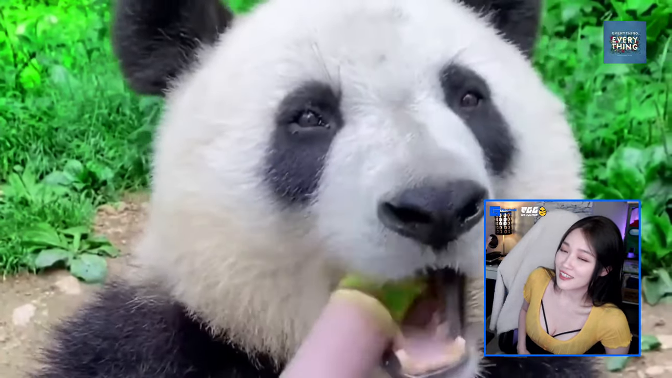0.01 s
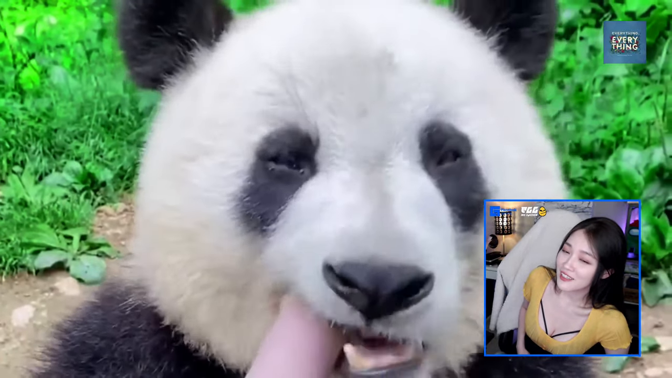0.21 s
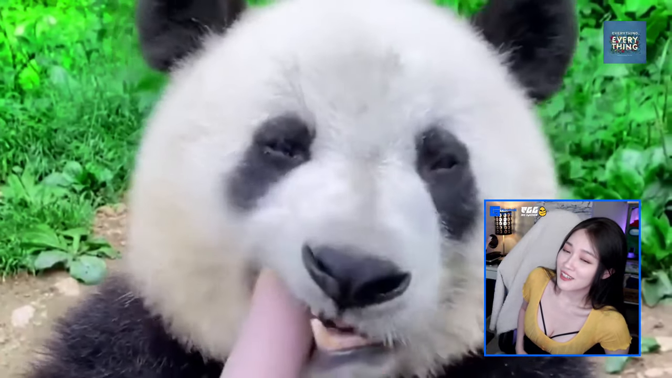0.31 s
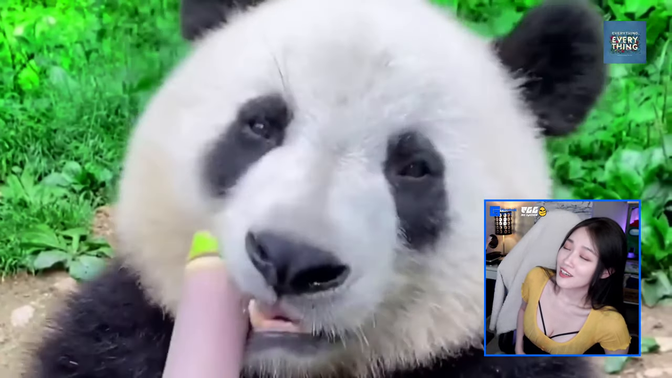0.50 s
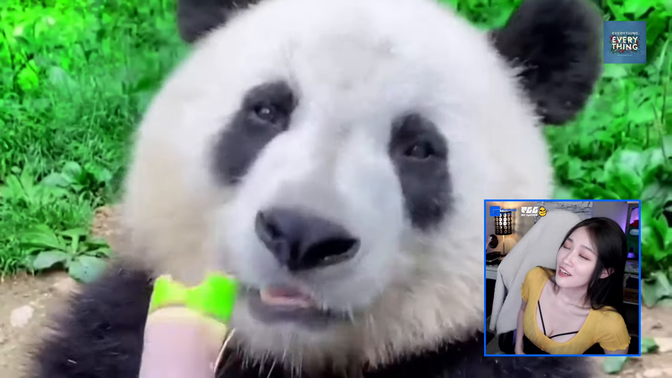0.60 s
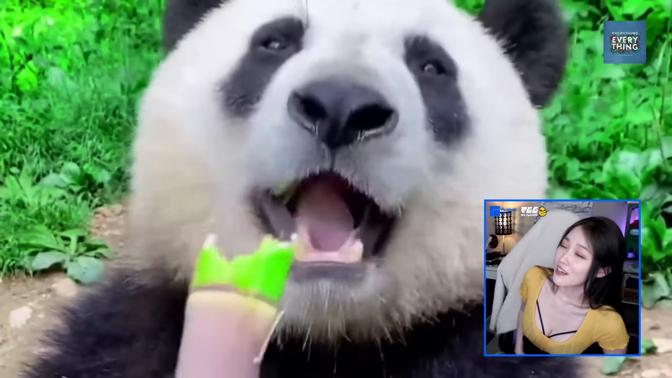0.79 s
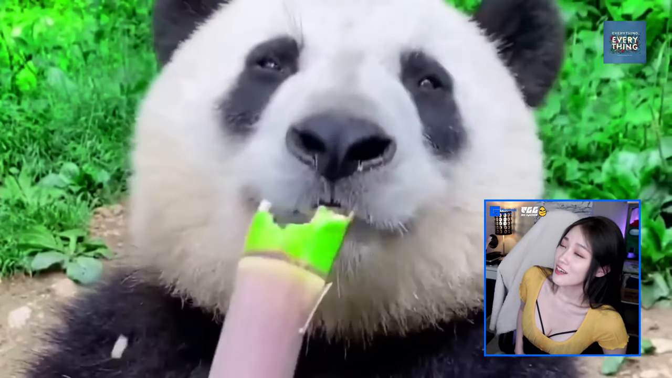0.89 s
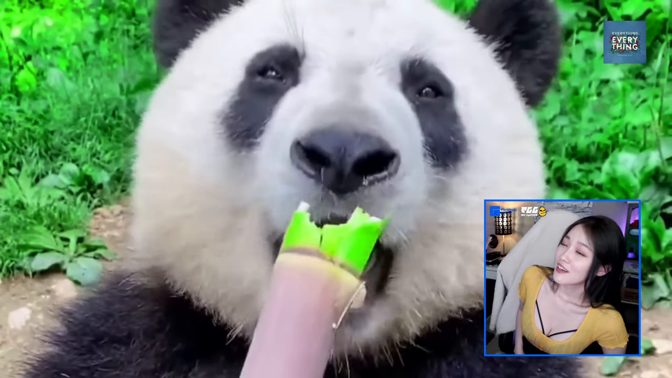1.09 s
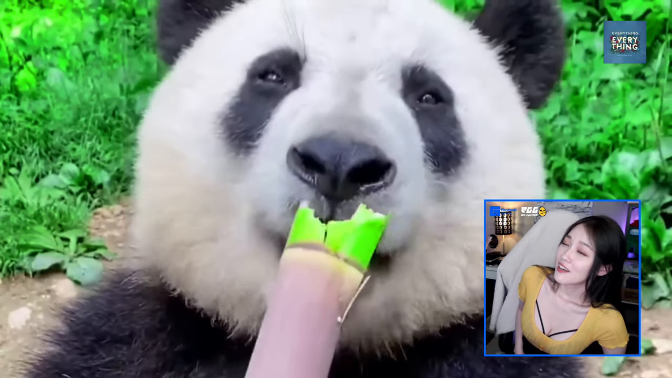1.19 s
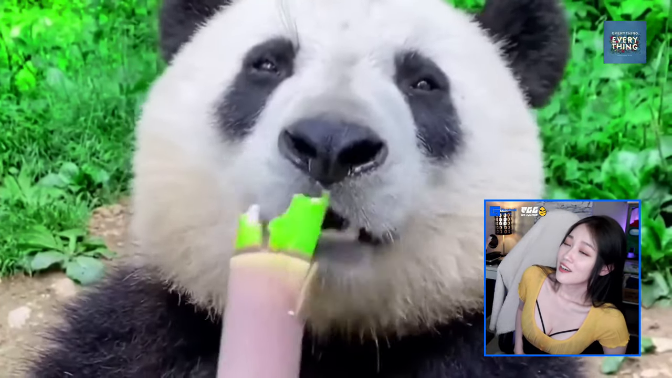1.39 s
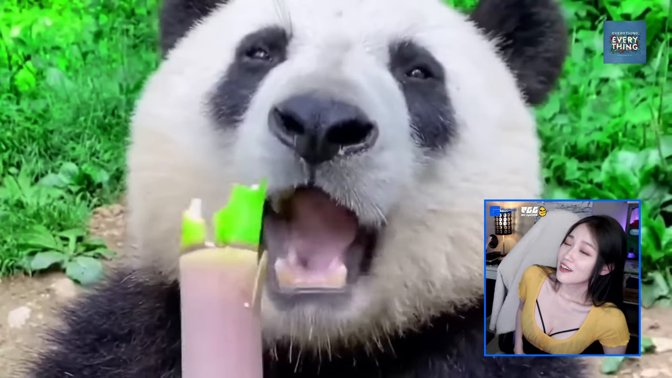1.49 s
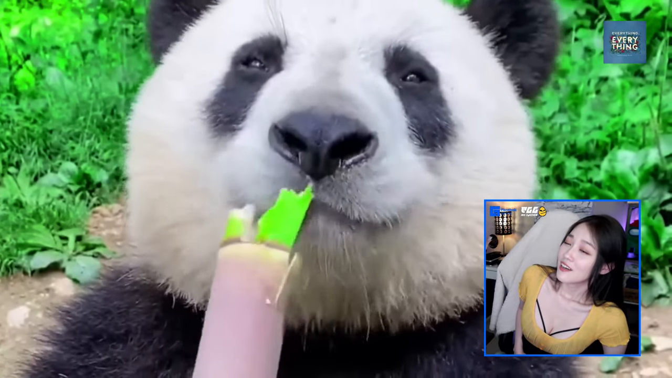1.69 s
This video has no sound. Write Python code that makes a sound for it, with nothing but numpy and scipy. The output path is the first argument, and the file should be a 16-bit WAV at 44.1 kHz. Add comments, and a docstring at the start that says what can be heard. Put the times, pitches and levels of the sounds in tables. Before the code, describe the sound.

A panda bites a bamboo shoot, close and dry outdoors. Small snaps and wet mouth pops open; at 0.25 seconds the hollow shoot cracks with a loud, short knock, fibres tearing until brighter final snaps near 0.63. From 0.8 to 1.7, softer, muffled wet chewing with irregular cracks, strongest near 1.1 and 1.48. A thin distant whistle sounds around 0.9, a low gurgle around 1.3, over faint steady air.

```python
"""A panda outdoors, close in front of the microphone, bites through a bamboo shoot and chews it.
First come wet pops of the mouth and a few small snaps. Then the hollow shoot gives way with a knock, a bank of
decaying sines, its fibres tear as coloured grains, and the last strands break one by one as clicked noise bursts.
The molars then crush the piece six or seven times a second, grains ringing in the changing mouth; a faint whistle
sounds far off, then a low gurgle of narrow noise. Steady outdoor air, filtered noise, lies behind it all."""
import sys
import numpy as np
from scipy import signal
from scipy.fft import rfft, irfft, next_fast_len
from scipy.io import wavfile

SR = 44100
rng = np.random.default_rng(int(sys.argv[2]) if len(sys.argv) > 2 else 0)


def bounce(signal):
    """Save signal as a 16-bit WAV file at the path given by the first command-line argument."""
    frames = np.transpose(np.atleast_2d(signal))
    limited = np.clip(frames, -1, 1)
    pcm = np.round(limited * 32767).astype(np.int16)
    wavfile.write(sys.argv[1], SR, pcm)


N = 77175
TIME = np.arange(N) / SR
TREBLE_HZ = 4870  # corner above which the treble of snaps, cracks, tearing and chewing is set


def amp(db):
    """Decibels to gain."""
    return 10 ** (np.asarray(db) / 20)


def unit(x):
    """Scale to rms 1."""
    return x / np.sqrt(np.mean(x ** 2) + 1e-20)


def at_hz(points, hz):
    """Read a spectrum in dB on a log-frequency axis."""
    point_hz, point_db = np.transpose(points)
    return np.interp(np.log(hz), np.log(point_hz), point_db)


def curve(rows):
    """A level curve as a gain, down at -120 dB outside its span, then any further columns."""
    s, db, *rest = np.transpose(rows)
    gain = amp(np.interp(TIME, s, db, left=-120, right=-120))
    return [gain] + [np.interp(TIME, s, column) for column in rest]


def shelf(hz, corner_hz):
    """0 in the bass, 1 in the treble."""
    return 1 / (1 + (corner_hz / hz) ** 4)


def resonance(hz, centre_hz, octaves):
    """1 at the centre, falling to a half this many octaves to either side."""
    return 1 / (1 + (np.log2(hz / centre_hz) / octaves) ** 2)


def colour(x, db_at):
    """Causal (minimum-phase) filter with the response db_at(Hz), made by folding the cepstrum."""
    n = x.shape[-1]
    size = 2 * next_fast_len(n)
    hz = np.maximum(np.arange(size // 2 + 1) * SR / size, 1)
    cepstrum = irfft(np.log(amp(db_at(hz))))
    cepstrum[1:size // 2] *= 2
    cepstrum[size // 2 + 1:] = 0
    response = np.exp(rfft(cepstrum))
    return irfft(rfft(x, size) * response)[..., :n]


def drift(rate_hz):
    """Slow chance with rms 1: noise through two equal low-pass poles, after a second of settling."""
    r = np.exp(-2 * np.pi * rate_hz / SR)
    slow = signal.lfilter([1], [1, -2 * r, r * r], rng.standard_normal(N + SR))
    return unit(slow[SR:])


def grains(per_s, spread_db, flutter_db):
    """Plant cells burst as clicks of uneven size and random sign, in clumps."""
    sizes = amp(spread_db * np.minimum(rng.exponential(1, N), 4))
    clicks = sizes * rng.choice([-1, 1], N) * (rng.random(N) < per_s / SR)
    return unit(clicks * amp(flutter_db * drift(62)))


FRACTURE_LEAD_S, FRACTURE_RISE_S = .008, 0.0012


def fractures(rows, body_db, click, size=2048):
    """Tiny cracks build up to a sharp click and then die away; the level is the rms over 5 ms."""
    lead = int(FRACTURE_LEAD_S * SR)
    out = np.zeros(N + size)
    t = (np.arange(size) - lead) / SR
    for s, db, decay_s, treble_db, *ring in rows:
        envelope = np.exp(np.minimum(t / FRACTURE_RISE_S, -t / decay_s))
        burst = unit(rng.standard_normal(size) * envelope)
        burst[lead] += click * np.sqrt(size)
        burst = colour(burst, lambda hz: body_db(hz, s, *ring) + treble_db * shelf(hz, TREBLE_HZ))
        start = max(int(s * SR), 0)
        out[start:start + size] += amp(db) * unit(burst) * np.sqrt(.005 * SR / size)
    return out[lead:lead + N]


# Colour of the breaking fibres in the open. Each row: frequency in Hz, level in dB.
OPEN_COLOUR = [(40, -30.5), (200, -21.5), (420, -2), (620, -7.5), (1200, 2.5), (1700, -4.5), (2150, -2),
               (3600, -4), (6300, -7.5), (7400, -13), (10000, -10), (15500, -20)]
SPLINTER_DB, SPLINTER_WIDTH_OCT = 13, 0.11


def splinter_db(hz, s, ring_hz):
    """Colour of a snap in the open, with the ring of its splinter."""
    return at_hz(OPEN_COLOUR, hz) + SPLINTER_DB * resonance(hz, ring_hz, SPLINTER_WIDTH_OCT)


# Fibres snapping at the front teeth. Each row: click time in seconds, level in dB, decay in seconds,
# treble boost in dB, ring of the splinter in Hz.
SNAPS = [(0.002, -28, 0.0044, -11.5, 1430), (0.1115, -44, 0.0035, 27, 6200),
         (0.1757, -46.5, 0.0036, -11, 3050), (0.2423, -19.5, 0.0033, -10, 2090),
         (0.261, -12.5, 0.0013, -18, 2130), (0.2755, -21.5, 0.0099, -0.5, 1000),
         (0.3086, -25, 0.0048, -4, 1150), (0.334, -25, 0.0014, -6, 4220), (0.3485, -21.5, 0.0079, -2, 980),
         (0.3808, -25, 0.0012, -10, 1420), (0.4475, -27.5, 0.0035, 8, 2140),
         (0.5015, -31, 0.0015, 19, 4470), (0.5128, -34, 0.0018, 17, 4330),
         (0.5784, -33.5, 0.00091, 18.5, 5340), (0.5963, -27, 0.0018, 4, 2300),
         (0.6123, -25, 0.00074, 12.5, 2250), (0.6241, -24, 0.00084, 29, 10450),
         (0.6312, -20.5, 0.0032, 6.5, 3410), (0.6331, -16.5, 0.0023, -4, 3740)]
# Tearing fibres. Each row: time in seconds, level in dB before the brightening.
TEAR = [(0, -36.5), (.055, -67.5), (.11, -45), (.14, -103), (.21, -52), (.268, -29.5), (.302, -39.5),
        (.33, -35), (.352, -22.5), (.40, -34.5), (.44, -38.5), (.458, -35), (.514, -37.5), (.535, -80),
        (.572, -59.5), (.60, -45.5), (.648, -41), (.72, -92)]
TEAR_GRAINS_PER_S, TEAR_SPREAD_DB, TEAR_FLUTTER_DB = 1800, 2, 3
TEAR_BRIGHTENS_DB_PER_S, TEAR_MID_S = 27.5, 0.27  # the treble is unchanged at the mid time


def bite(click):
    """Fibres snap and tear; the tearing brightens as the strands get thinner."""
    cells = grains(TEAR_GRAINS_PER_S, TEAR_SPREAD_DB, TEAR_FLUTTER_DB)
    tear = unit(colour(cells, lambda hz: at_hz(OPEN_COLOUR, hz)))
    low = signal.sosfiltfilt(signal.butter(2, TREBLE_HZ, fs=SR, output="sos"), tear)
    treble_gain = amp(TEAR_BRIGHTENS_DB_PER_S * (TIME - TEAR_MID_S))
    tear = low + (tear - low) * treble_gain
    return tear * curve(TEAR)[0] + fractures(SNAPS, splinter_db, click)


# Knocks of the hollow shoot as it gives way. Each row: start in seconds, level in dB, treble boost in dB.
KNOCKS = [(0.2425, -21.5, 3.5), (0.2627, -4, 1), (0.2766, -16, 9)]
# Modes of the shoot. Each row: frequency in Hz, level in dB, time to fall by 60 dB in seconds.
SHOOT_MODES = [(430, -1, 0.04), (470, -3.5, 0.099), (1066, -5.5, 0.041), (1779, -13, 0.051),
               (2160, -22.5, 0.021)]
KNOCK_ATTACK_S, KNOCK_TREBLE_HZ = 0.0029, 770


def hollow_shoot():
    """The shoot rings briefly in its decaying modes when its wall breaks."""
    out = np.zeros(N)
    for s, db, treble_db in KNOCKS:
        t = np.maximum(TIME - s, 0)
        attack = 1 - np.exp(-(t / KNOCK_ATTACK_S) ** 2)
        for hz, mode_db, t60_s in SHOOT_MODES:
            fade = np.exp(-np.log(1000) * t / t60_s) * attack
            gain = amp(db + mode_db + treble_db * shelf(hz, KNOCK_TREBLE_HZ))
            out += gain * fade * np.sin(2 * np.pi * hz * t)
    return out


# Colour of the breaking fibres inside the mouth. Each row: frequency in Hz, level in dB.
MOUTH_COLOUR = [(40, -21), (200, -17), (520, -10.5), (750, -1.5), (1500, -0.5), (2600, -3.5), (4600, -6.5),
                (7000, -17.5), (15500, -25.5)]
MOUTH_PEAKS_DB, MOUTH_WIDTH_OCT = (12.5, 7.5, 9), 0.12


def mouth_db(hz, s):
    """Colour of the mouth, with three resonances, during the stroke nearest to time s."""
    chew = min(CHEWS, key=lambda row: abs(row[0] - s))
    centres_hz = chew[-len(MOUTH_PEAKS_DB):]
    peaks = zip(centres_hz, MOUTH_PEAKS_DB)
    return at_hz(MOUTH_COLOUR, hz) + sum(db * resonance(hz, centre, MOUTH_WIDTH_OCT) for centre, db in peaks)


# Chewing strokes. Each row: time of full pressure in seconds, level there in dB, attack, hold and release
# in seconds, treble boost in dB, three mouth resonances in Hz.
CHEWS = [(0.794, -51.5, 0.039, 0.011, 0.053, 14, 1025, 1774, 2390),
         (0.941, -33.5, 0.018, 0.025, 0.026, 4.5, 910, 1650, 3350),
         (1.097, -34.5, 0.0052, 0.073, 0.005, 4, 1072, 2220, 2660),
         (1.272, -38, 0.011, 0.031, 0.061, 5.5, 1042, 1295, 2010),
         (1.487, -33.5, 0.026, 0.037, .012, 8.5, 1058, 1430, 2210),
         (1.623, -34.5, 0.0049, 0.022, 0.015, -7.5, 960, 3380, 4560),
         (1.699, -42, 0.078, 0.01, 0.034, 2.5, 1030, 1320, 2300)]
# Pieces cracking between the molars. Each row: click time in seconds, level in dB, decay in seconds,
# treble boost in dB.
CRACKS = [(0.942, -28, 0.016, 3.5), (0.956, -31, 0.002, -4), (1.094, -26.5, 0.0098, -8),
          (1.110, -31, 0.0027, 8), (1.1165, -19.5, 0.0029, -16), (1.1445, -29.5, 0.0069, 6.5),
          (1.276, -33.5, 0.0026, -12), (1.4752, -18, 0.0021, -25.5), (1.511, -33, 0.00074, -9),
          (1.6195, -32.5, 0.0014, -23), (1.7168, -34.5, 0.0011, 6.5)]
CHEW_GRAINS_PER_S, CHEW_SPREAD_DB, CHEW_FLUTTER_DB = 1800, 1.5, 3.5


def chewing(click):
    """Strokes crush wet pulp while a few pieces crack, all heard through the mouth."""
    out = fractures(CRACKS, mouth_db, click)
    for s, db, attack_s, hold_s, release_s, treble_db, *_ in CHEWS:
        rise = np.minimum(TIME - s, 0) / attack_s
        fall = np.maximum(TIME - s - hold_s, 0) / release_s
        pressure = np.exp(rise - fall)
        cells = grains(CHEW_GRAINS_PER_S, CHEW_SPREAD_DB, CHEW_FLUTTER_DB)
        pulp = unit(colour(cells, lambda hz: mouth_db(hz, s) + treble_db * shelf(hz, TREBLE_HZ)))
        out = out + amp(db) * pressure * pulp
    return out


# Wet pops. Each row: start in seconds, level in dB before the fade and the random waver.
POPS = [(0.0255, -30), (0.1755, -30.5), (1.153, -27.5), (1.519, -26)]
POP_HZ, POP_T60_S = 719, 0.061


def pops():
    """Tongue and lips come unstuck and the mouth cavity rings, wavering at random."""
    out = np.zeros(N)
    for s, db in POPS:
        t = np.maximum(TIME - s, 0)
        fade = np.exp(-np.log(1000) * t / POP_T60_S) * (1 - np.exp(-t / KNOCK_ATTACK_S))
        waver = 0.75 * drift(60)
        out += amp(db) * fade * waver * np.sin(2 * np.pi * POP_HZ * t)
    return out


# Low gurgle during the chewing. Each row: time in seconds, level of the resonance in dB, its pitch in Hz.
GURGLE = [(1.19, -63, 336.8), (1.315, -47.5, 267.7), (1.36, -51.5, 184), (1.47, -59.5, 137),
          (1.55, -62.5, 128)]
GURGLE_WIDTH_HZ = 43
GURGLE_RUMBLE_DB, RUMBLE_LOW_HZ, RUMBLE_TOP_HZ = 2, 71.5, 440  # rumble level is relative to the resonance


def gurgle():
    """A rough low resonance, slow noise shifted up in pitch, sinks over a soft rumble."""
    gain, hz = curve(GURGLE)
    roughness = drift(GURGLE_WIDTH_HZ) + 1j * drift(GURGLE_WIDTH_HZ)
    ring = unit(np.real(roughness * np.exp(2j * np.pi * np.cumsum(hz) / SR)))
    band = signal.butter(2, [RUMBLE_LOW_HZ, RUMBLE_TOP_HZ], "band", fs=SR, output="sos")
    rumble = unit(signal.sosfilt(band, rng.standard_normal(N)))
    return gain * (ring + amp(GURGLE_RUMBLE_DB) * rumble)


# Thin distant whistle, perhaps a bird. Each row: time in seconds, level in dB, pitch in Hz.
WHISTLE = [(.81, -57, 4880), (.87, -51.5, 4690), (.91, -49, 4720), (1.01, -54, 4680), (1.1, -62, 4700)]
WHISTLE_WAVER_HZ = 28


def whistle(flutter_db=5.5):
    """One thin sine that falls and then roughly holds, its pitch and level fluttering."""
    gain, hz = curve(WHISTLE)
    wavering_hz = hz + WHISTLE_WAVER_HZ * drift(65)
    note = np.sin(2 * np.pi * np.cumsum(wavering_hz) / SR)
    return gain * unit(amp(flutter_db * drift(39)) * note)


# Colour of the outdoor background. Each row: frequency in Hz, level in dB.
AIR_COLOUR = [(30, -15.5), (430, 4.5), (800, -9), (2500, -4), (15500, -13.5)]
AIR_DB = -60


def air():
    """Steady outdoor background of filtered noise."""
    return amp(AIR_DB) * unit(colour(rng.standard_normal(N), lambda hz: at_hz(AIR_COLOUR, hz)))


def panned(x, db):
    """Place a sound by its left-minus-right level."""
    return x * amp(np.array([[db], [-db]]) / 2)


def reflections(x, decay_s):
    """A dense dying cloud of reflections, a quarter second of fading noise with unit energy."""
    t = TIME[:SR // 4]
    cloud = rng.standard_normal(len(t)) * np.exp(-t / decay_s)
    return signal.fftconvolve(x, cloud / np.linalg.norm(cloud))[:N]


# Colour of the left-right difference. Each row: frequency in Hz, level in dB.
WIDTH = [(200, -8), (1100, -10.5), (2200, -9.5), (4000, -5.5), (13000, -5)]
ECHO_DB, ECHO_T60_S = -15.5, 0.18
KNOCK_PAN_DB = -7.5  # leans to the right


def scene():
    """The animal just ahead; a second independent draw without clicks gives width, and a faint tail follows."""
    jaws = bite(click=0.48) + chewing(click=0.65) + pops()
    mid = jaws + gurgle() + whistle() + air()
    second_draw = bite(click=0) + chewing(click=0) + gurgle() + air()
    side = colour(second_draw, lambda hz: at_hz(WIDTH, hz))  # added on the left, subtracted on the right
    echo = np.array([reflections(jaws, ECHO_T60_S / np.log(1000)) for _ in range(2)])
    knocks = panned(hollow_shoot(), KNOCK_PAN_DB)
    return mid + np.array([side, -side]) + knocks + amp(ECHO_DB) * echo


CUTOFF_HZ = 16200


def record(dry):
    """At the microphone the highest peaks are rounded below 0.9 and the top is cut steeply."""
    rounded = dry / (1 + (dry / .9) ** 6) ** (1 / 6)
    top_cut = signal.ellip(10, .2, 80, CUTOFF_HZ, fs=SR, output="sos")
    return signal.sosfilt(top_cut, rounded)


dry = scene()
out = record(dry)
bounce(out)
```